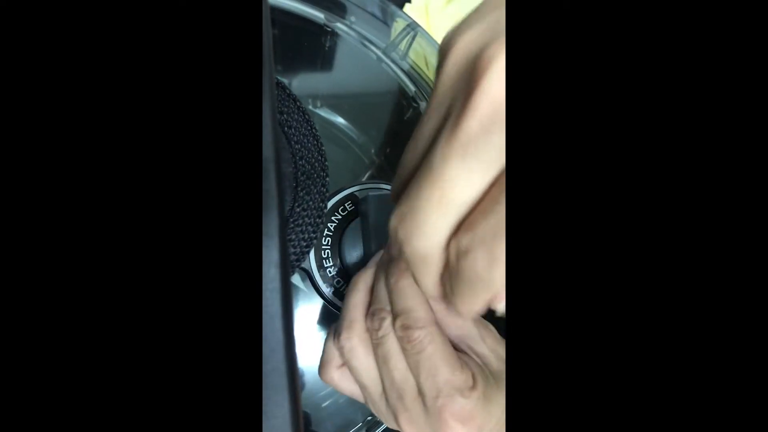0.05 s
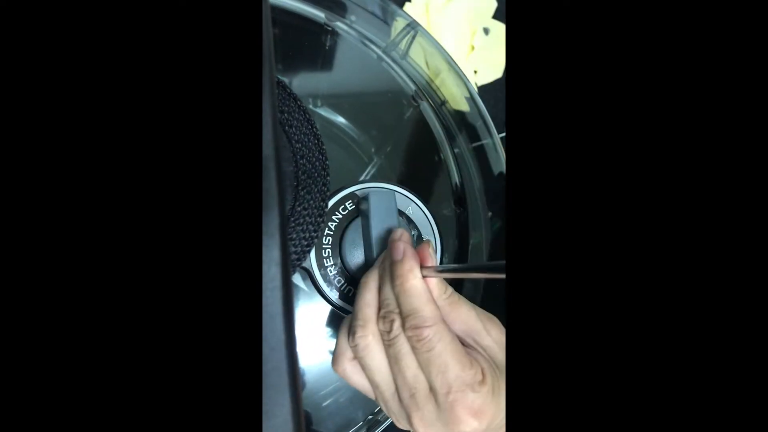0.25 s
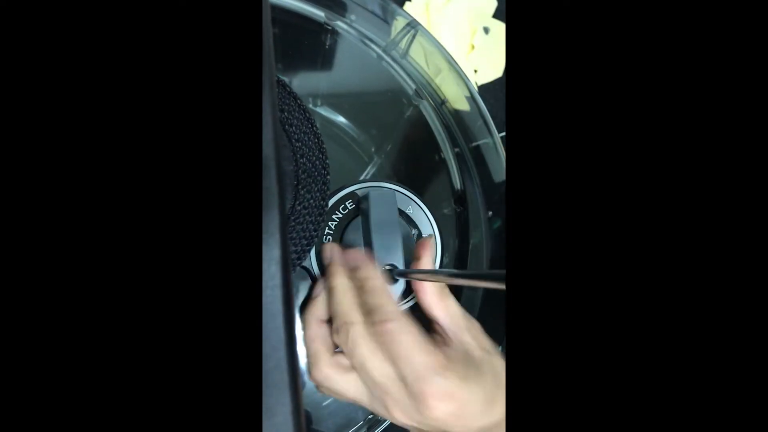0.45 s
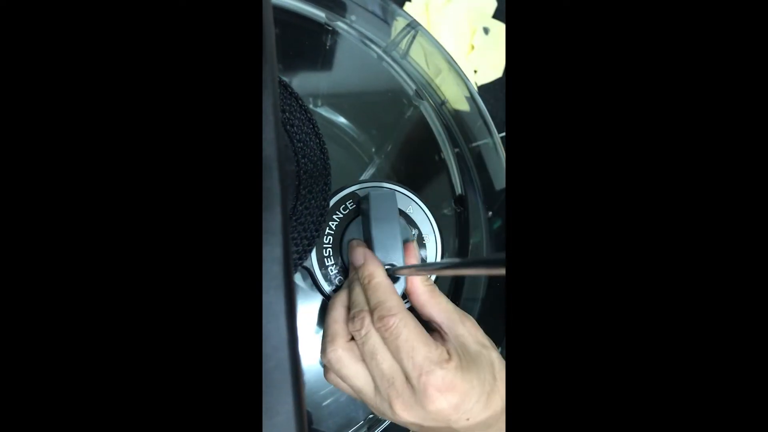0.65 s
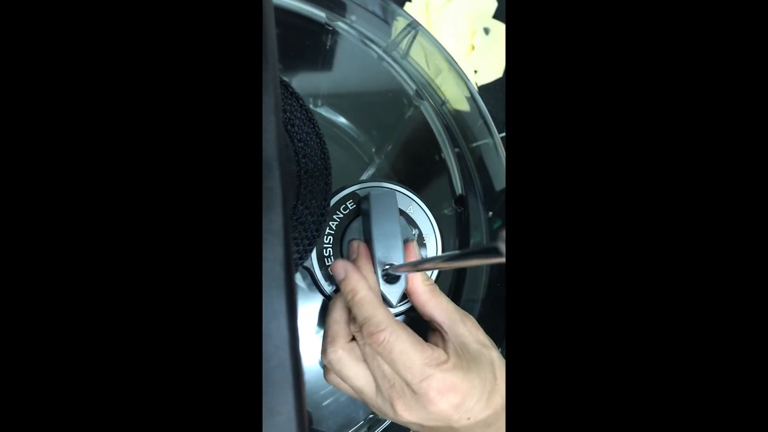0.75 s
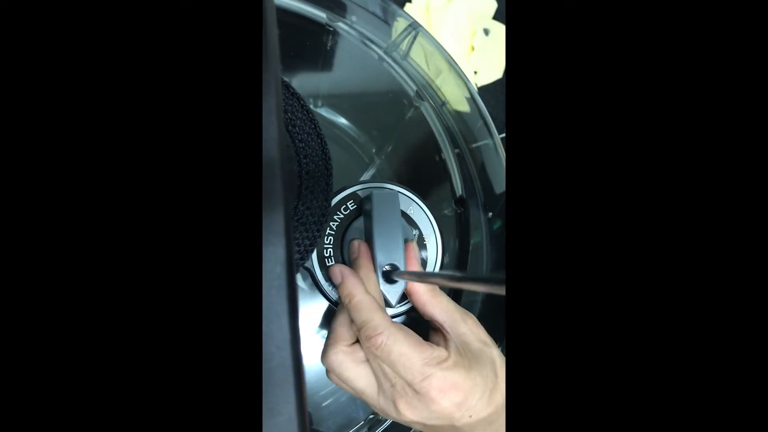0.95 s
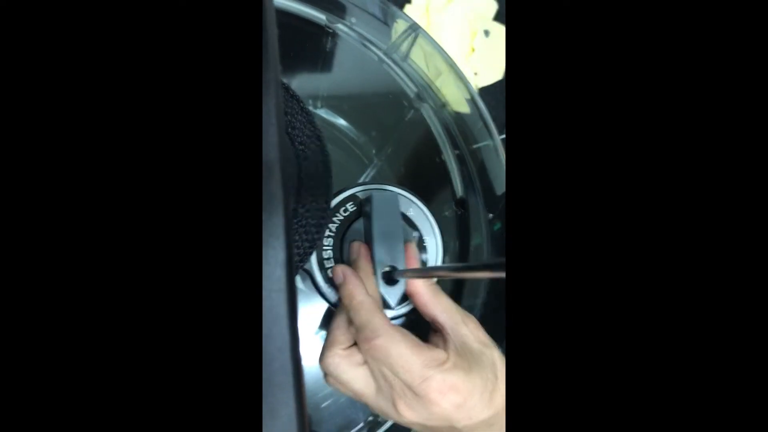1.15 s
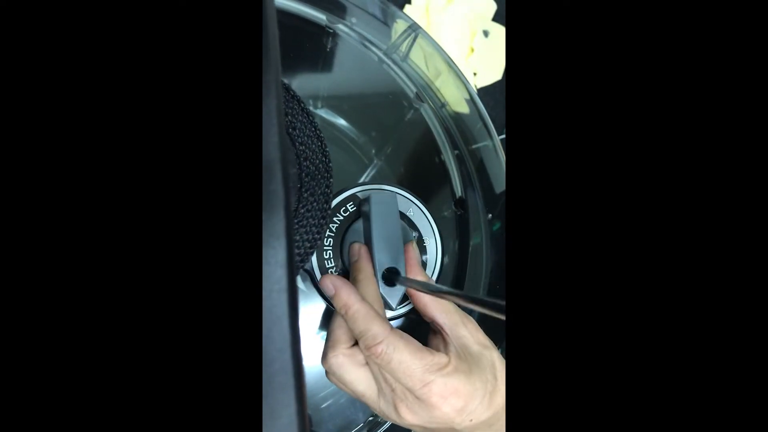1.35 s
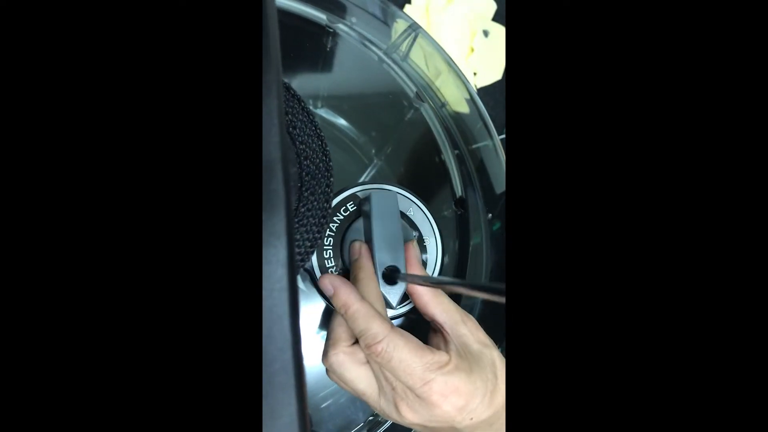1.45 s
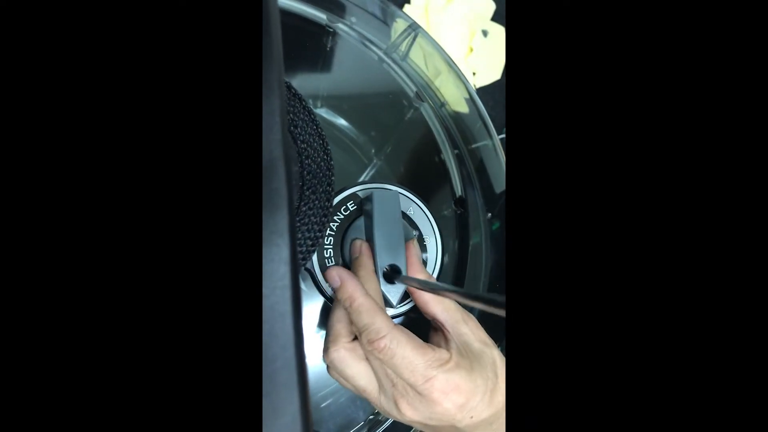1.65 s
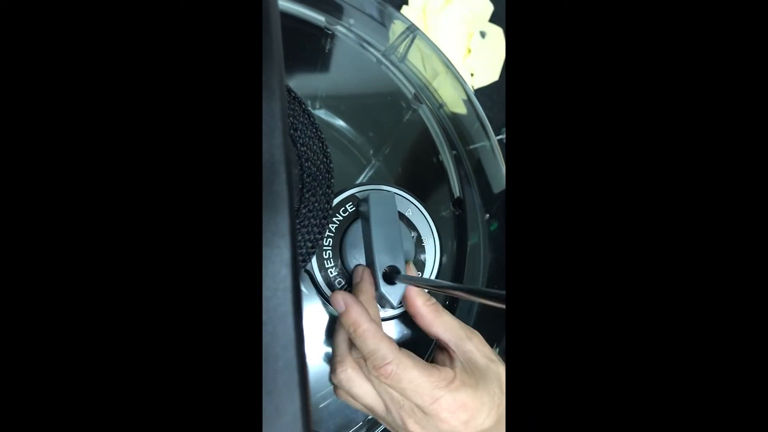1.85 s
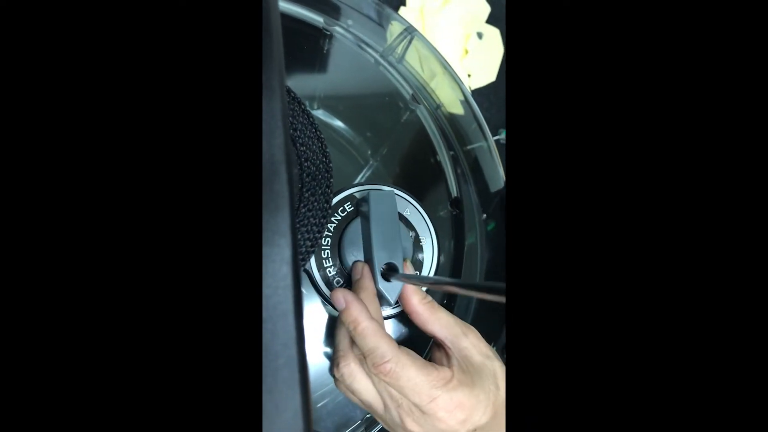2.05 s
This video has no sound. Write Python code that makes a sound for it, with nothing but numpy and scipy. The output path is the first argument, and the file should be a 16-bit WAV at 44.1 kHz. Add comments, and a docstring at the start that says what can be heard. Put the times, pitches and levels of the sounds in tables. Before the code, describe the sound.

A hand rubs a plastic water tank's knob in uneven strokes, with faint screwdriver ticks.

```python
"""A hand and a screwdriver rub on the knob of a plastic water tank, close to a mono microphone.
Each stroke is a rush of tiny frictional slips: they excite the modes of the shell, while finer grit
hisses at the contact, and the sound dies away slowly. The tank booms softly as it is pushed, and the
tool ticks against the screw. Dull room noise lies underneath."""
import sys
import numpy as np
from scipy import signal
from scipy.fft import rfft, irfft, next_fast_len
from scipy.io import wavfile
from scipy.ndimage import map_coordinates

SR = 44100
rng = np.random.default_rng(int(sys.argv[2]) if len(sys.argv) > 2 else 0)


def wav_record(signal):
    """Record a signal, one row per channel, as 16-bit PCM in the file named by sys.argv[1]."""
    frames = np.transpose(np.atleast_2d(signal))
    bounded = np.clip(frames, -1, 1)
    # unit amplitude maps onto the largest positive 16-bit level
    quanta = np.round(bounded * 32767).astype(np.int16)
    wavfile.write(sys.argv[1], SR, quanta)


N = 92610

# Rubbing strokes. Each row: start in seconds, rise and hold of the hiss in seconds,
# levels of shell, hiss and fizz in dB, fall of shell and hiss in dB per second.
STROKES = [(0.005, 0.077, 0.011, -48, -82, -92, 67), (0.167, .07, 0.017, -42.5, -73, -85, 53),
           (0.244, .02, 0.021, -36.5, -52.5, -59, 38), (0.383, 0.022, 0.017, -33, -42.5, -48, 82),
           (0.489, 0.075, 0.025, -35.5, -51, -57.5, 56), (0.587, 0.033, .03, -36.5, -53, -64, 80),
           (0.684, 0.05, 0.024, -29.5, -51.5, -53, 92), (0.795, 0.023, 0.014, -36.5, -50.5, -56.5, 59),
           (0.846, 0.017, 0.015, -36, -59, -66, 37), (1.044, .022, 0.045, -37.5, -52.5, -59.5, 102),
           (1.19, 0.026, 0.047, -36.5, -53, -61.5, 100), (1.477, 0.051, 0.056, -31.5, -57, -50.5, 97),
           (1.524, 0.047, 0.05, -40.5, -46.5, -57, 90), (1.65, 0.039, 0.048, -41, -59.5, -81, 65)]
# Distinct modes of the shell. Each row: frequency in Hz, bandwidth in Hz, relative gain in dB.
SHELL_MODES = [(140, 12, -5), (190, 12, -27), (344.9, 4.9, 7.5), (499, 15.4, -1), (638, 48, -4),
               (812, 11.3, 1), (965, 7.3, -4.5), (992.7, 34, 2.5), (1060, 35, 0), (1184.5, 21, 7),
               (1266, 7.2, 5), (1365.5, 17, 3), (1508, 17, 2), (1679, 7.9, 4), (1880, 15, -12.5),
               (2200, 25, -33), (2417, 20, -17), (3470, 8.4, -22), (3900, 23, -21)]
# Dense, weaker modes between them. Each row: frequency in Hz, relative gain in dB.
DENSE_MODE_SPECTRUM = [(40, -13), (100, -7), (300, -3.5), (430, -20.5), (700, -5.5), (1050, -4),
                       (1400, -7.5), (1900, -7.5), (2400, -14.5), (2800, -23), (3800, -22.5), (6000, -48),
                       (15000, -74)]
# Hiss of the sliding contact. Each row: frequency in Hz, relative gain in dB.
HISS_SPECTRUM = [(300, -6), (1500, 0), (2400, 11.5), (2900, -3.5), (3800, 2), (4600, -7.5), (6600, 4),
                 (8000, -12.5), (10400, -36), (15700, -17)]
# Fizz above the hiss. Each row: frequency in Hz, relative gain in dB.
FIZZ_SPECTRUM = [(300, -52), (5000, -4), (8000, 0), (9100, 1.5), (9600, 7.5), (10400, -6.5), (11400, 3),
                 (13000, -8.5), (15700, -6)]
# Pushes on the tank. Each row: peak time in seconds, Gaussian width in seconds, pitch in Hz, level in dB.
PUSHES = [(.105, 0.044, 52, -53.5), (.13, 0.03, 324, -49), (.27, 0.036, 240, -45),
          (.345, 0.084, 303, -45.5), (.425, 0.077, 210, -42), (.695, 0.047, 205, -42.5),
          (.79, 0.095, 116, -48), (0.962, 0.027, 118, -42.5), (1.03, 0.041, 57.4, -45.5),
          (1.07, 0.04, 183, -45.5), (1.131, 0.17, 325, -50), (1.3, 0.016, 203, -46),
          (1.532, 0.017, 336, -38), (1.61, 0.082, 95, -50.5), (1.75, 0.087, 330, -48),
          (1.755, 0.028, 652, -45), (1.81, 0.025, 110, -49.5), (1.98, 0.031, 70.6, -51)]
# Tool contacts. Each row: start in seconds, level in dB, centre frequency in Hz,
# Gaussian width in octaves, time to fall 60 dB in seconds.
TICKS = [(.347, -57, 9400, .03, .08), (.380, -51.5, 9800, 0.033, 0.035), (0.398, -41, 9700, .03, 0.042),
         (.926, -57, 13000, .15, 0.041), (0.985, -49, 13500, 0.13, 0.038), (.990, -54, 12000, .3, 0.011),
         (1.041, -37.5, 4500, 1.0, 0.018), (1.377, -53.5, 12600, .1, 0.01), (1.46, -54, 6900, 0.98, 0.015),
         (1.967, -46.5, 1680, 0.49, 0.076), (2.015, -56.5, 1700, 0.99, .05)]
# Room noise. Each row: frequency in Hz, relative gain in dB.
ROOM_SPECTRUM = [(20, -30), (32, -3), (48, 3.5), (110, 1), (200, -1.5), (340, -6), (450, -10.5), (1100, -8),
                 (2000, -15.5), (3000, -28.5), (5000, -34.5), (10000, -39), (15500, -36)]

SLIPS_PER_S, SLIP_SPREAD_DB = 7000, 1.5
GRIT_PER_S, GRIT_SPREAD_DB = 12000, 0.5
SHELL_WAVER_DB, HISS_WAVER_DB = 0.4, 1.3
WALL_T60_S, WALL_DB = 0.093, -3
LOW_CUT_HZ, ROLL_OFF_HZ, TOP_HZ = 38, 14300, 15750


def rubbing():
    """Sliding friction: slips ring the shell, while finer grit hisses and fizzes at the contact."""
    shell_level, hiss_level, fizz_level = stroke_envelopes()
    shell = shell_ring() * shell_level
    hiss = contact_grit(HISS_SPECTRUM) * hiss_level
    fizz = contact_grit(FIZZ_SPECTRUM) * fizz_level
    waver = wobble(knots_per_s=180)
    return shell * amp(-SHELL_WAVER_DB * waver) + (hiss + fizz) * amp(-HISS_WAVER_DB * waver)


def stroke_envelopes():
    """Incoherent sounds add in power: overlapping strokes rise, hold and decay exponentially."""
    t, power = np.arange(N) / SR, np.zeros((3, N))
    for start, rise, hold, shell_db, hiss_db, fizz_db, fall in STROKES:
        falling_s = np.maximum(t - start - rise - hold, 0)
        # The fizz peaks first and dies fastest.
        layers = [(shell_db, 0.73, 1), (hiss_db, 1, 1), (fizz_db, 0.38, 1.12)]
        for layer, (db, rise_share, fall_ratio) in enumerate(layers):
            attack = np.clip((t - start) / (rise * rise_share), 0, 1)
            power[layer] += (attack * amp(db - fall * fall_ratio * falling_s)) ** 2
    return np.sqrt(power)


def shell_ring():
    """Modal superposition: the shell answers the slips with the sum of its resonances."""
    modes = lambda f: sum(amp(db) * resonance(f, hz, width) for hz, width, db in SHELL_MODES)
    distinct = filtered(slips(SLIPS_PER_S, SLIP_SPREAD_DB), modes)
    diffuse = wall_ring(slips(SLIPS_PER_S, SLIP_SPREAD_DB))
    return unit(distinct + coloured(diffuse, DENSE_MODE_SPECTRUM))


def contact_grit(spectrum):
    """Shot noise: fine impulses come so densely that they merge into a hiss."""
    return unit(coloured(wall_ring(slips(GRIT_PER_S, GRIT_SPREAD_DB)), spectrum))


def slips(per_s, spread_db):
    """Stick-slip friction releases tiny impulses of random timing, sign and size."""
    slipping = rng.random(N) < per_s / SR
    sign = rng.choice([-1, 1], N)
    return unit(slipping * sign * amp(spread_db * rng.standard_normal(N)))


def wall_ring(x):
    """Modal overlap: countless weak wall modes add a short, diffuse tail to every slip."""
    t = np.arange(SR // 4) / SR
    tail = rng.standard_normal(len(t)) * amp(-60 * t / WALL_T60_S)
    return x + amp(WALL_DB) * signal.fftconvolve(x, tail / np.linalg.norm(tail))[:N]


def tank_booms():
    """Narrow-band resonance: each push swells and fades as a boom of the filled tank, wavering in pitch."""
    t, out = np.arange(N) / SR, np.zeros(N)
    for peak, width, hz, db in PUSHES:
        band = filtered(rng.standard_normal(N), lambda f: resonance(f, hz, width_hz=68) ** 2)
        analytic = signal.hilbert(unit(band))
        boom = unit(analytic.real / np.sqrt(np.abs(analytic) ** 2 + 2))  # evens out the loudness
        swell = np.exp(-.5 * ((t - peak) / width) ** 2)
        out += amp(db) * swell * boom
    return out


def screwdriver_ticks():
    """Damped impacts: each contact of the tip is a band of noise that decays exponentially."""
    t, out = np.arange(N) / SR, np.zeros(N)
    for start, db, hz, octaves, t60 in TICKS:
        band = lambda f: np.exp(-.5 * (np.log2((f + 1) / hz) / octaves) ** 2)
        envelope = (t >= start) * amp(db - 60 * np.abs(t - start) / t60)
        out += unit(filtered(rng.standard_normal(N), band)) * envelope
    return out


def room_noise(db=-50):
    """Stationary noise, strongest at low frequencies, forms a dull background."""
    return amp(db) * unit(coloured(rng.standard_normal(N), ROOM_SPECTRUM))


def amp(db):
    """Amplitude grows tenfold every 20 dB."""
    return 10 ** (np.asarray(db) / 20)


def unit(x):
    """Dividing by the RMS gives unit power."""
    return x / np.sqrt(np.mean(x ** 2) + 1e-20)


def filtered(x, response):
    """A linear filter multiplies the spectrum by its frequency response."""
    size = next_fast_len(N + SR // 2)
    return irfft(rfft(x, size) * response(np.fft.rfftfreq(size, 1 / SR)), size)[..., :N]


def coloured(x, spectrum):
    """Spectral shaping: the gain joins (Hz, dB) points on a logarithmic frequency axis."""
    hz, db = np.transpose(spectrum)
    return filtered(x, lambda f: amp(np.interp(np.log(f + 1), np.log(hz + 1), db)))


def resonance(f, hz, width_hz):
    """A damped oscillator responds most at its natural frequency, here with unit gain."""
    return 1j * f * width_hz / (hz * hz - f * f + 1j * f * width_hz)


def wobble(knots_per_s):
    """Spline interpolation joins random knots into a smooth curve."""
    knots = rng.standard_normal(N // 20)
    return map_coordinates(knots, [np.arange(N) * knots_per_s / SR], mode="mirror")


def scene():
    """Superposition: the pressures add at one point, the same in both channels."""
    mono = rubbing() + tank_booms() + screwdriver_ticks() + room_noise()
    return np.array([mono, mono])


def record(dry):
    """Band limiting cuts the deepest rumble, softens the top and passes nothing above TOP_HZ."""
    band = signal.butter(4, [LOW_CUT_HZ, ROLL_OFF_HZ], "bandpass", fs=SR, output="sos")
    return filtered(signal.sosfilt(band, dry), lambda hz: hz < TOP_HZ)


dry = scene()
out = record(dry)
wav_record(out)
```